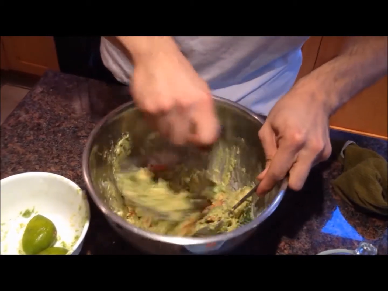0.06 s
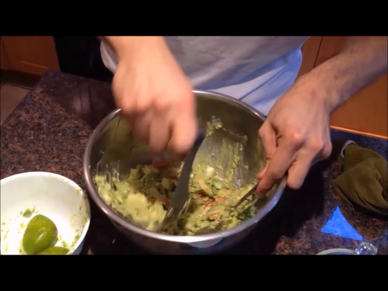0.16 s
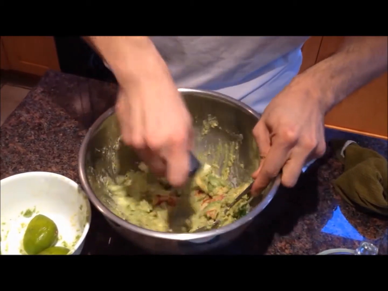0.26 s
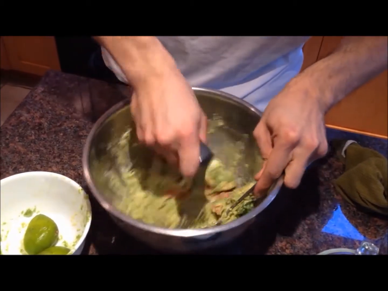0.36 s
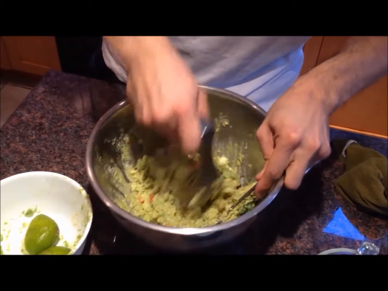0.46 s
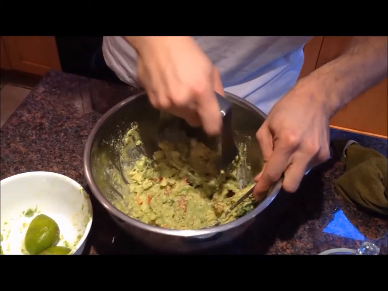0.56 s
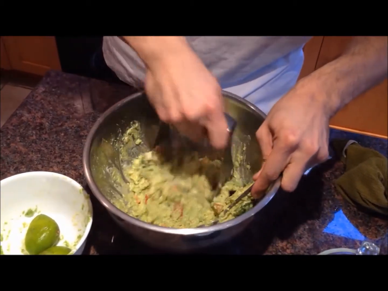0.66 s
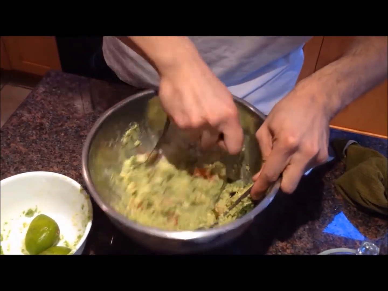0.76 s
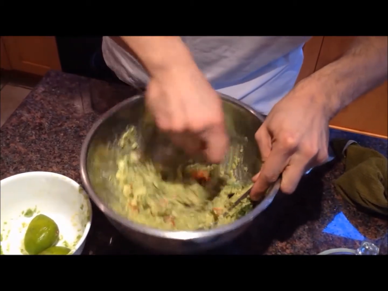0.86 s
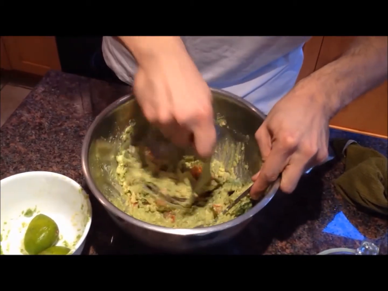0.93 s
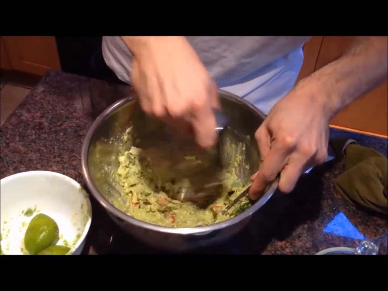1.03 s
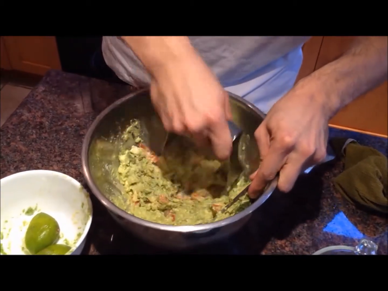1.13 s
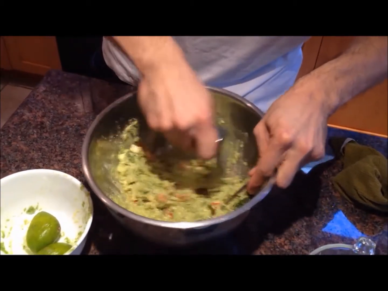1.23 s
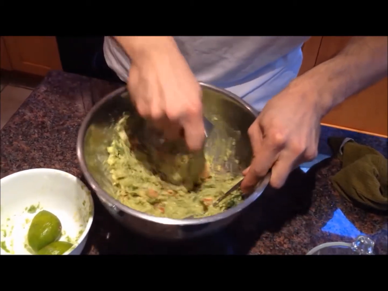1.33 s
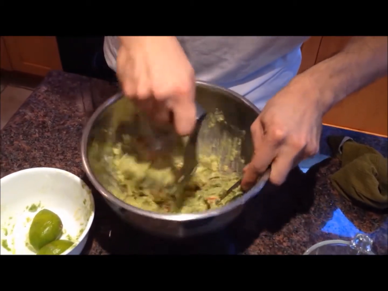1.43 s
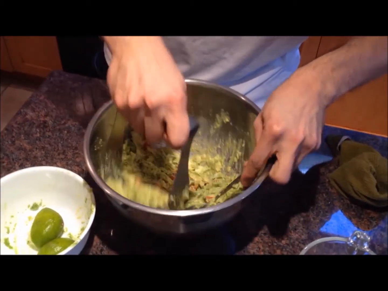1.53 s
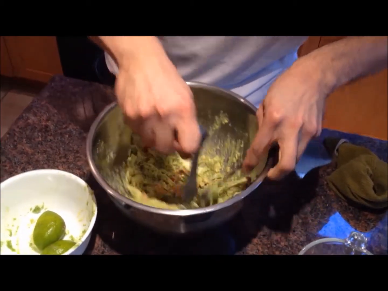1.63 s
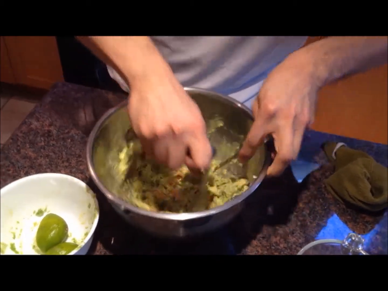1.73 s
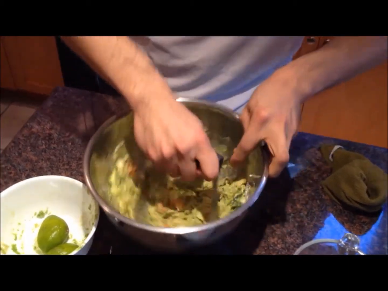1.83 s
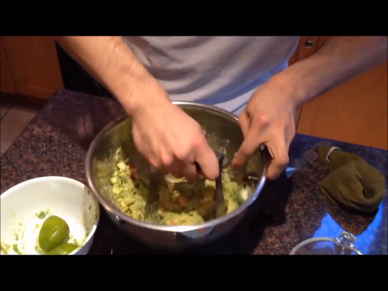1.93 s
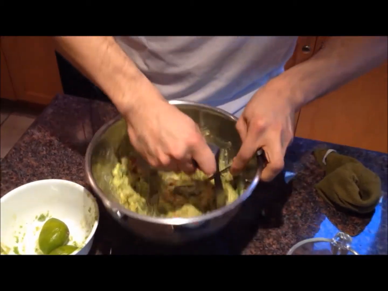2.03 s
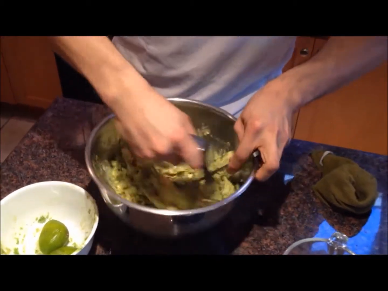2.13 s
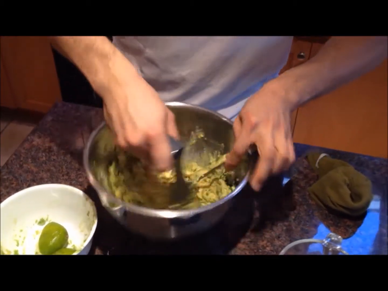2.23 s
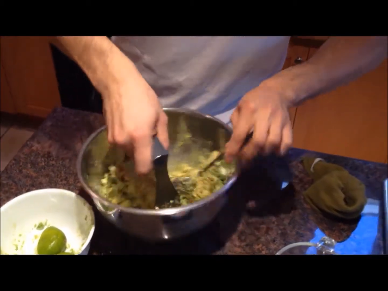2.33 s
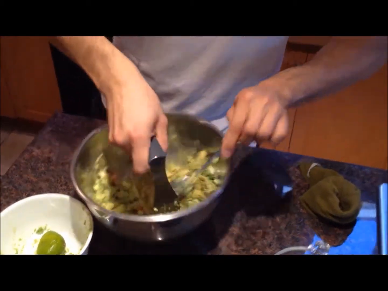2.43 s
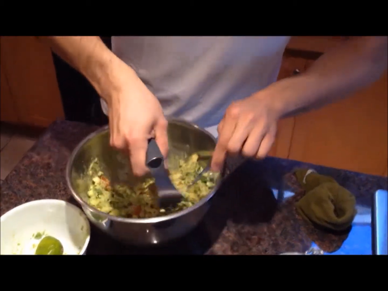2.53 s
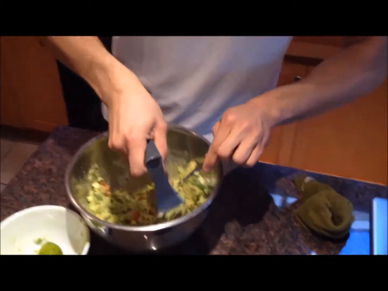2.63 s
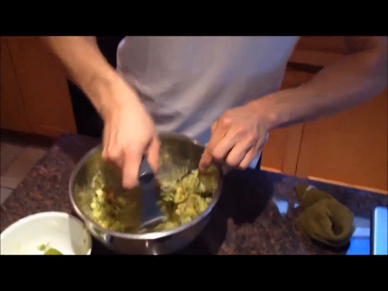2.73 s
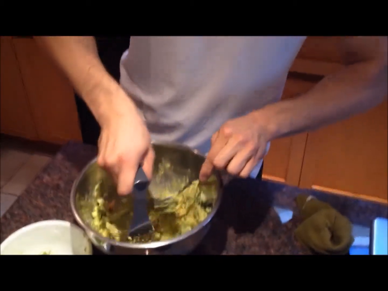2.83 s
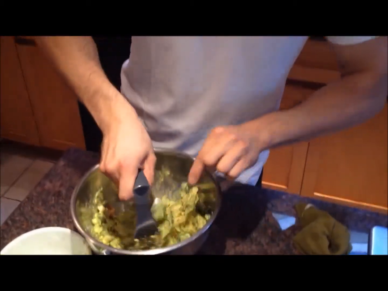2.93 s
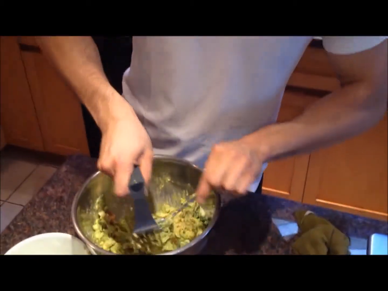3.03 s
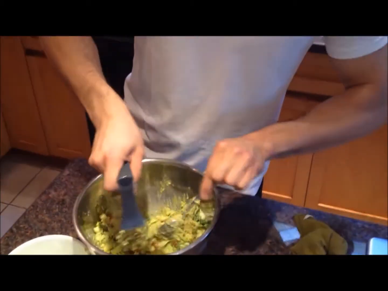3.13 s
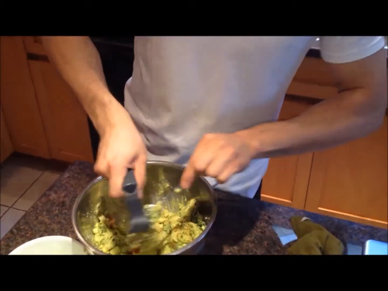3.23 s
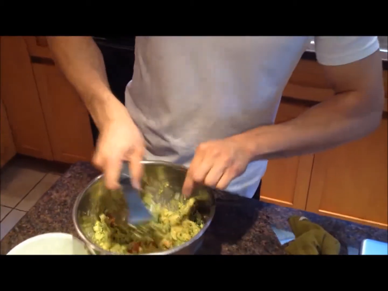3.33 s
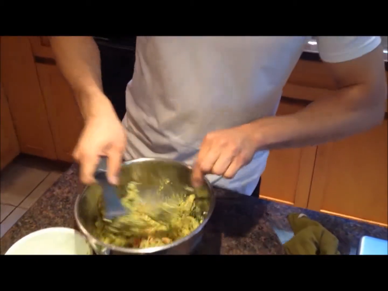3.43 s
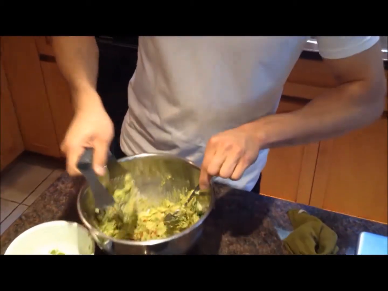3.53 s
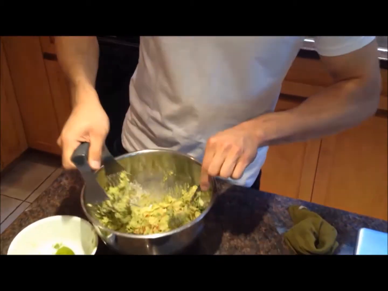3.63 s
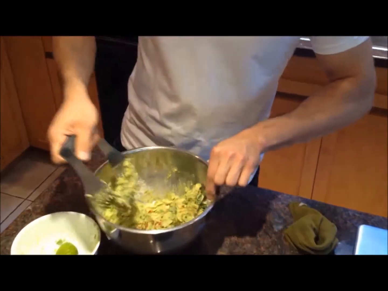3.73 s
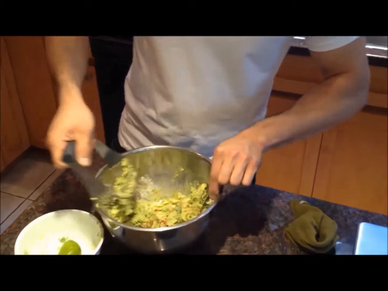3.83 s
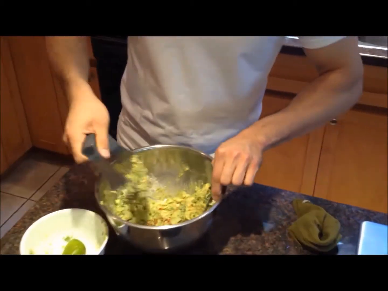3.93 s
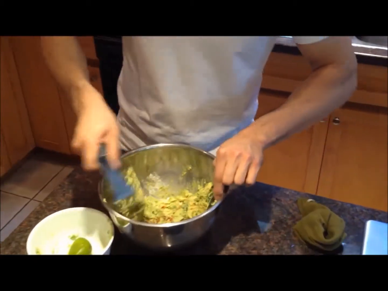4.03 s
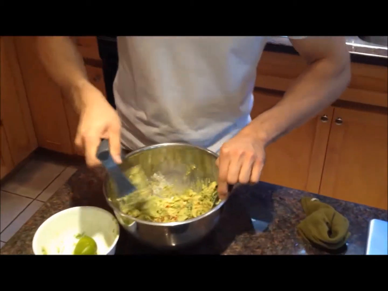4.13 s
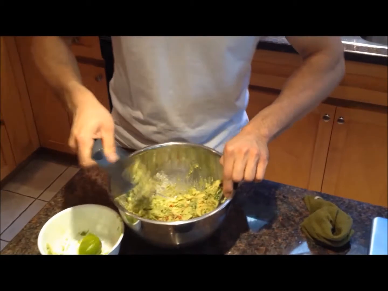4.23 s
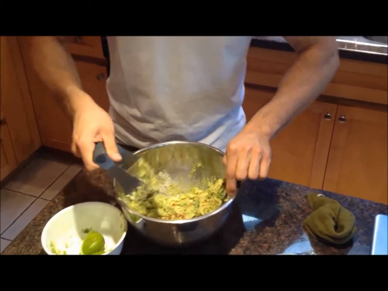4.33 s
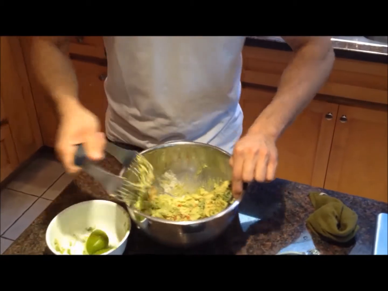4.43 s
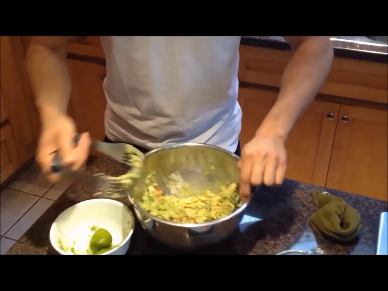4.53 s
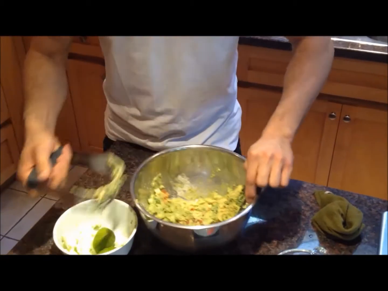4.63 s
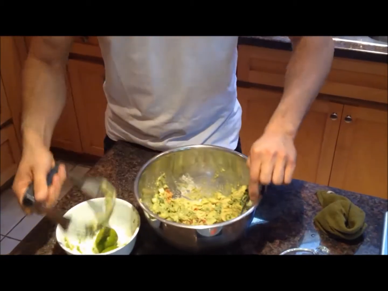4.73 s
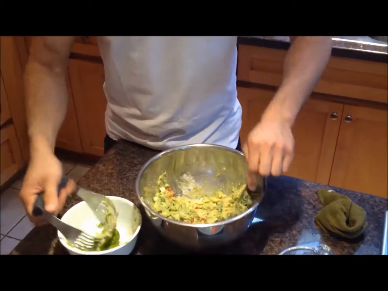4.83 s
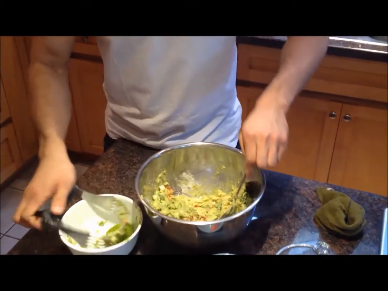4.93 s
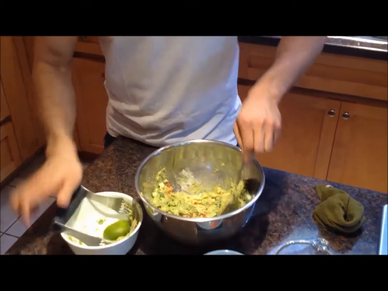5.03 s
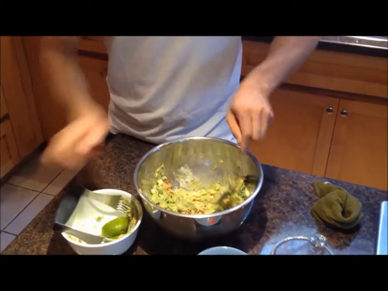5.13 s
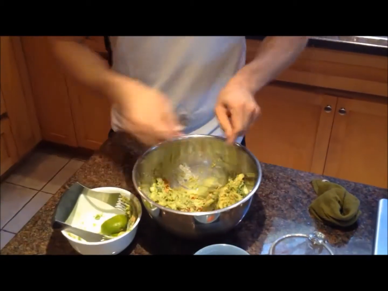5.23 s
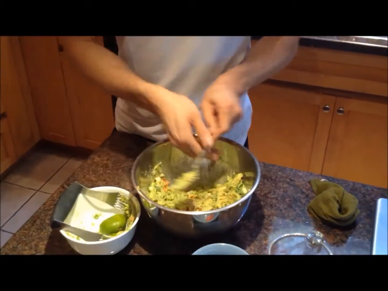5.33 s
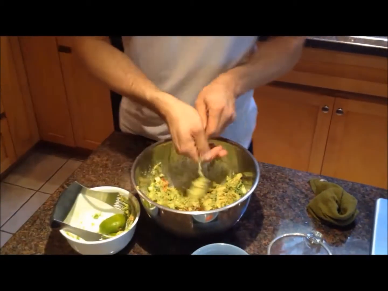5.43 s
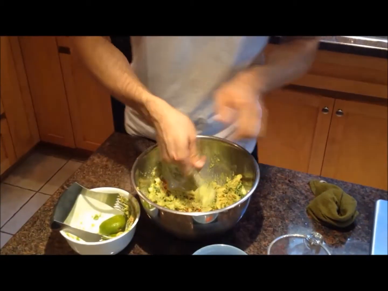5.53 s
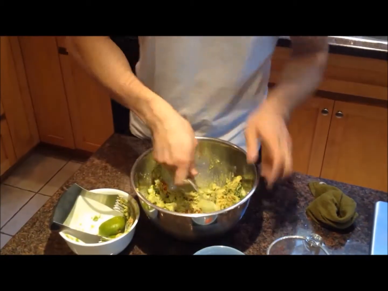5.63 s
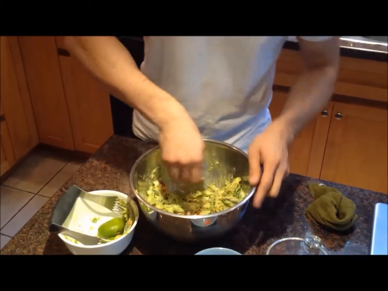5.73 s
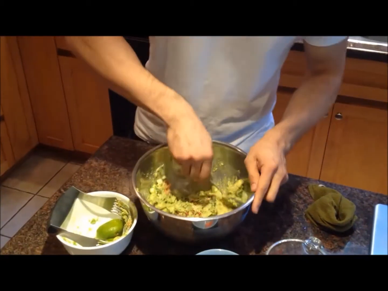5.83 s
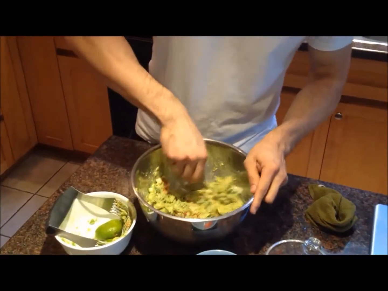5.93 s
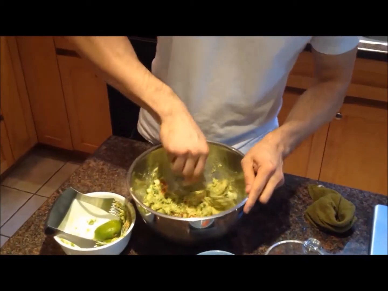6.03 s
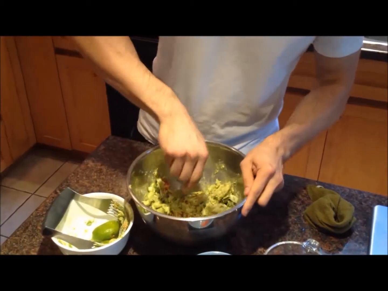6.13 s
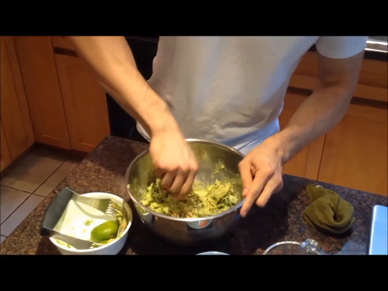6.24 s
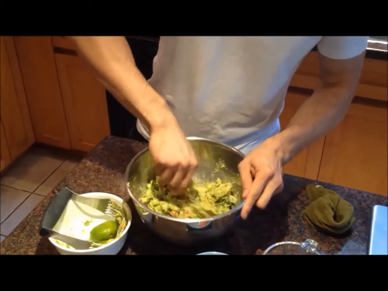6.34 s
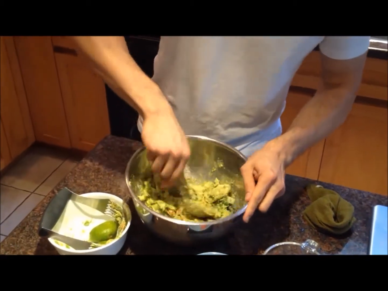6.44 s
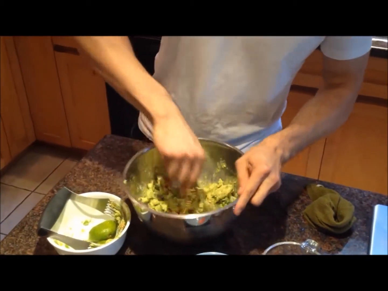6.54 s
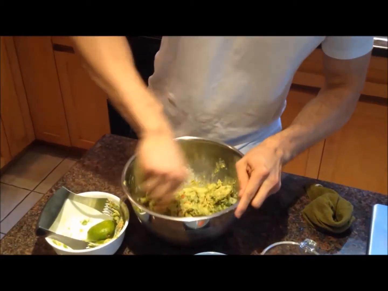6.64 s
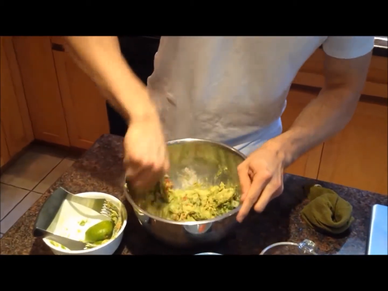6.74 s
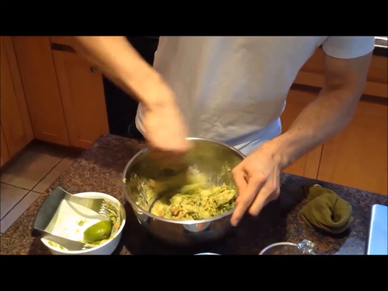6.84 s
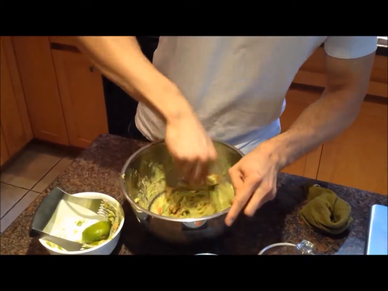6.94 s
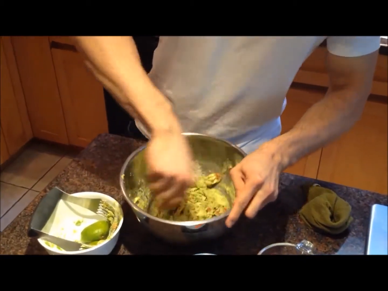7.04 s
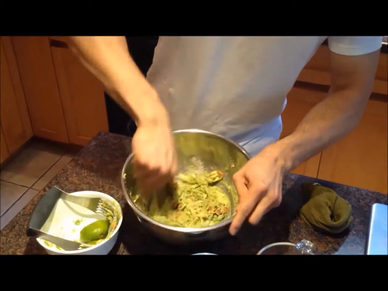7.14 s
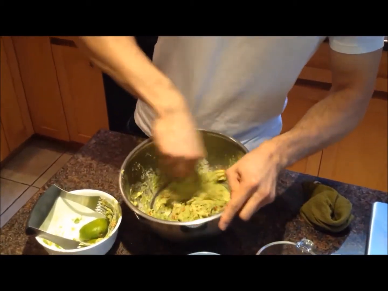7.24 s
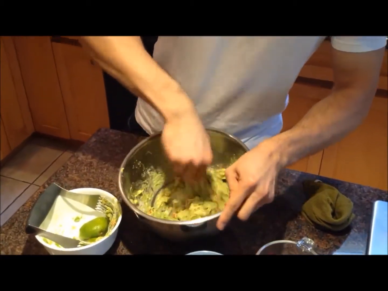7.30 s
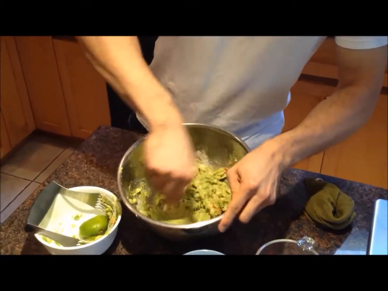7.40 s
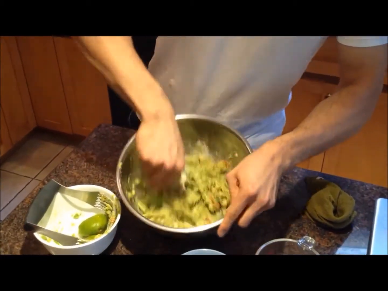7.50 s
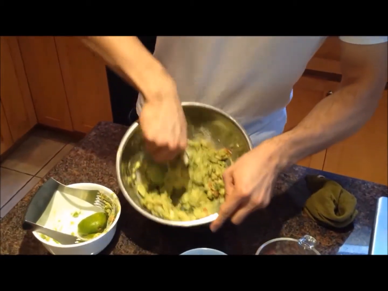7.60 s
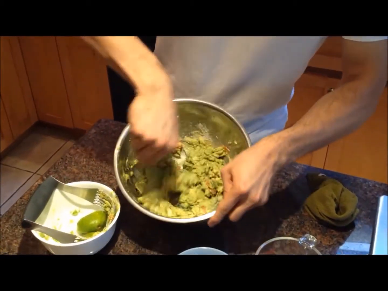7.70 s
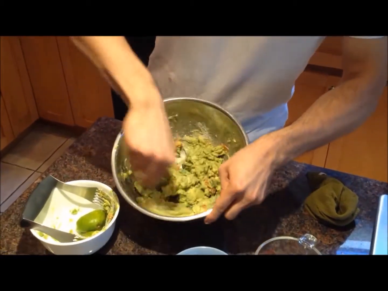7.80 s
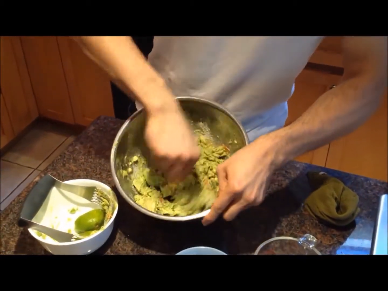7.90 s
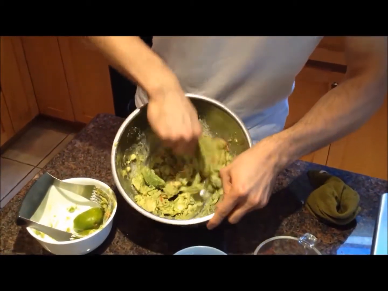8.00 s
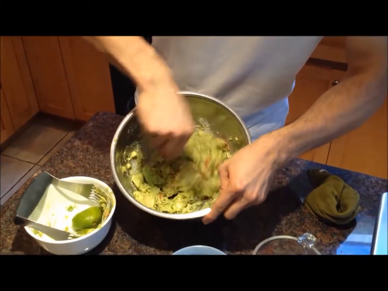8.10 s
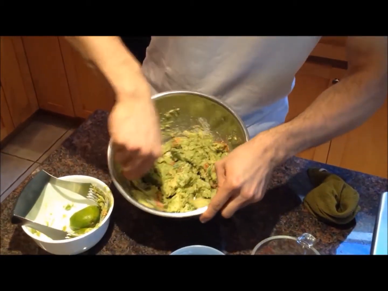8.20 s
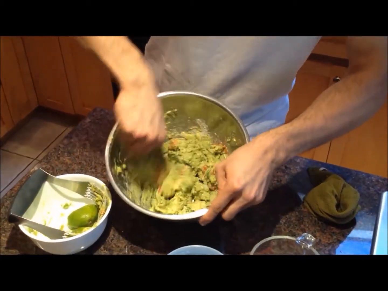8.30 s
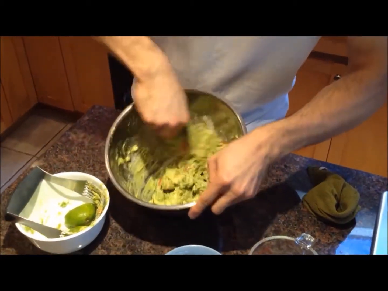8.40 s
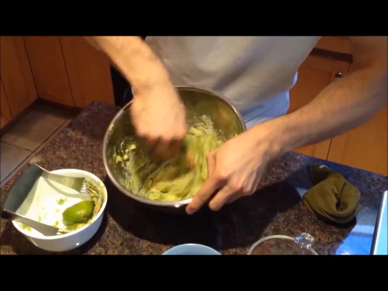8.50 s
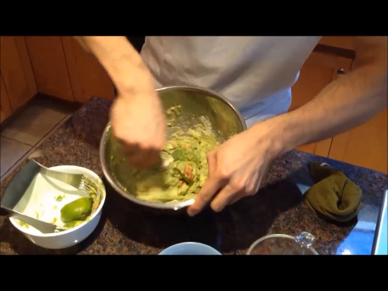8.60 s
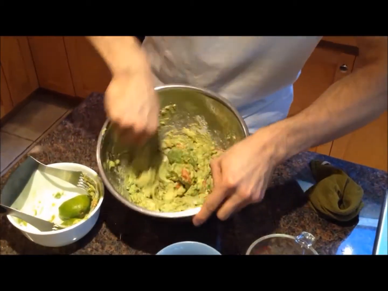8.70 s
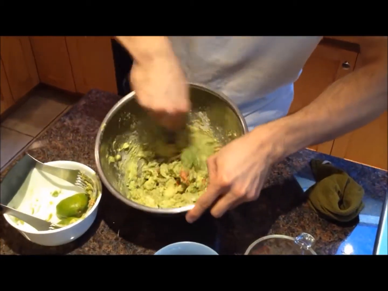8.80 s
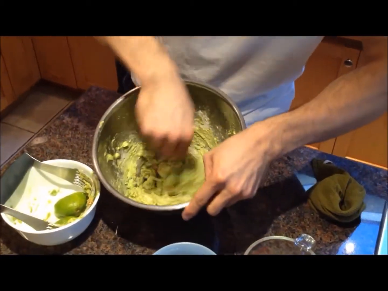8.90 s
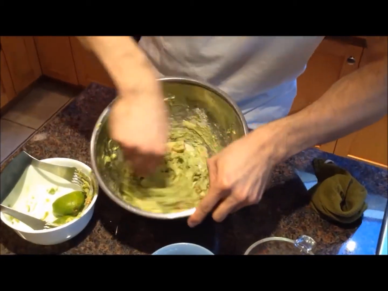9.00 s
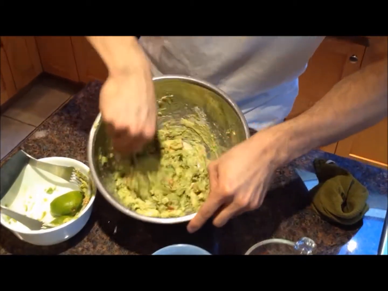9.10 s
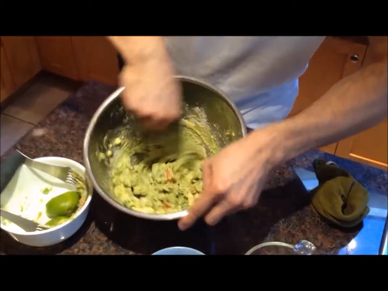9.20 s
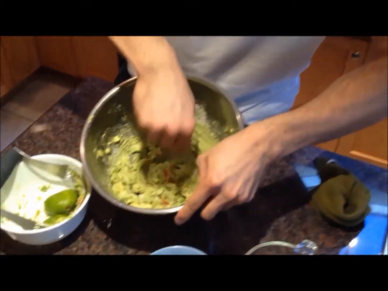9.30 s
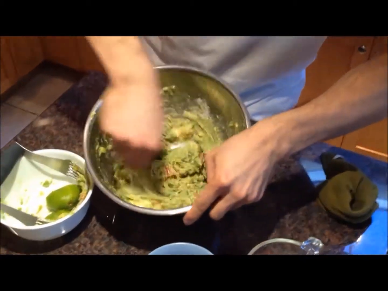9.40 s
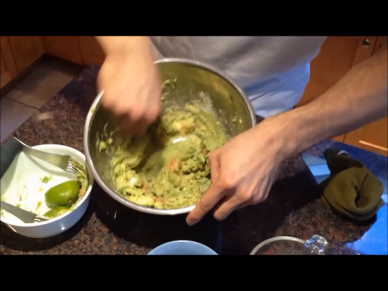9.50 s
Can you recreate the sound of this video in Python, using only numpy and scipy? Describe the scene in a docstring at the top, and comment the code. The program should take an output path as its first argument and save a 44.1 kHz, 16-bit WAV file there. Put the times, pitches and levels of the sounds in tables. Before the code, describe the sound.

In a small hard kitchen, a masher and fork churn avocado in a steel bowl with sticky crackles, smacks and dull booming knocks. Near the middle, tines tap the rim with clear rings and the masher clatters into a china dish. Then the fork stirs on with softer, thicker strokes. The microphone is close, mono, with short room reflections and a faint hiss and drone.

```python
"""A wet crackling stroke, then knocks: a fork and a masher work avocado in a steel bowl on a stone counter.
Strokes drive pops, smacks and churning noise; knocks add contact noise to the boom and ring of a mash-damped bowl.
Near halfway the tines tap the rim and ring it, and the masher clatters into a china dish; then the fork stirs on.
Thin sine whistles, one stick-slip squeak, faint hiss and an appliance drone lie beneath.
A small hard room, decaying noise after the direct sound, answers blows, mash and whistles."""
import sys
import numpy as np
from scipy import signal
from scipy.fft import rfft, irfft
from scipy.io import wavfile

SR = 44100
rng = np.random.default_rng(int(sys.argv[2]) if len(sys.argv) > 2 else 0)


def unload_audio(sound):
    """Save the sound as a 16-bit wav file, at the path given as the first command line argument."""
    columns = np.transpose(np.atleast_2d(sound))
    # keep every value between -1 and 1, then stretch to whole-number steps
    steps = np.round(np.clip(columns, -1, 1) * 32767)
    wavfile.write(sys.argv[1], SR, steps.astype(np.int16))


N = 421596
TIME = np.arange(N) / SR
AGE = TIME[:SR]  # time since a blow [s]


def amp(db):
    """Decibels to gain."""
    return 10 ** (np.asarray(db) / 20)


def unit(x):
    """Scale to an energy of one."""
    return x / np.sqrt(np.sum(x ** 2))


def steady(x):
    """Scale to a standard deviation of one."""
    return x / np.std(x)


def fade(t60_s):
    """Exponential decay: 60 dB in t60_s."""
    return np.exp(-np.log(1000) * AGE / t60_s)


def burst(t60_s):
    """Decaying white noise of unit energy."""
    return unit(rng.standard_normal(SR) * fade(t60_s))


def band(x, lo_hz, hi_hz, order=3):
    """Causal Butterworth band-pass."""
    edges_hz = [lo_hz, min(hi_hz, 0.49 * SR)]
    return signal.sosfilt(signal.butter(order, edges_hz, "band", fs=SR, output="sos"), x)


def resonate(x, hz, q):
    """One two-pole resonance."""
    return signal.lfilter(*signal.iirpeak(hz, q, fs=SR), x)


def resonate_twice(x, hz, q):
    """Two equal resonances in series: steeper skirts."""
    return resonate(resonate(x, hz, q), hz, q)


def colour(x, points, size=4096):
    """Minimum-phase filter through (frequency [Hz], gain [dB]) points."""
    hz, db = np.transpose(points)
    log_hz = np.log(np.fft.rfftfreq(size, 1 / SR) + 1)
    gain = amp(np.interp(log_hz, np.log(hz), db))
    cepstrum = irfft(np.log(gain))[:size // 2]
    cepstrum[1:] *= 2  # folded cepstrum: causal response
    response = irfft(np.exp(rfft(cepstrum, size)))
    return signal.fftconvolve(x, response)[:len(x)]


def add(out, s, x):
    """Mix a sound in at time s [s]."""
    i = max(int(s * SR), 0)
    out[i:i + len(x)] += x[:N - i]


KITCHEN_T60_S, KITCHEN_TREBLE_T60_S, KITCHEN_DB = 0.57, 0.31, -4


def kitchen(early_db=-6, early_t60_s=0.097, gap_s=0.0058):
    """Direct sound, quick echoes from bowl and counter, then the room, whose treble dies first."""
    low = band(burst(KITCHEN_T60_S), 40, 3500, order=2)
    treble = band(burst(KITCHEN_TREBLE_T60_S), 3000, SR / 2, order=2)
    echoes = amp(KITCHEN_DB) * (low + treble) + amp(early_db) * burst(early_t60_s)
    onset = np.clip(AGE / gap_s - 0.5, 0, 1)  # half open at gap_s
    return signal.unit_impulse(SR) + echoes * onset


# spectrum of the room's hiss: (frequency [Hz], gain [dB])
AIR_COLOUR = [(40, -31), (90, -24), (190, -1), (400, -1.5), (700, -9), (1500, -13), (3000, -20),
              (7000, -21), (15000, -30)]
AIR_DB = -60
HUM_HZ, HUM_DB = 384.7, -61.5


def room_air(hum_q=25):
    """Faint coloured hiss, and narrow-band noise as the drone of a kitchen appliance."""
    hiss = steady(colour(rng.standard_normal(N), AIR_COLOUR))
    hum = steady(resonate_twice(rng.standard_normal(N), HUM_HZ, hum_q))
    return amp(AIR_DB) * hiss + amp(HUM_DB) * hum


# faint high whistles: (start [s], length [s], top [Hz], pitch sag at both ends [0-1], level [dB])
WHISTLE_EVENTS = [(1.297, 0.23, 11500, .07, -61), (3.17, 0.19, 9600, 0.13, -56),
                  (3.48, 0.23, 12800, 0.2, -55.5), (3.565, 0.12, 8230, 0.1, -51.5),
                  (5.72, 0.14, 13200, .09, -67), (5.928, 0.23, 9650, 0.2, -60.5)]


def whistles(waver=0.006):
    """Thin, very high sines that arch in pitch and waver."""
    out = np.zeros(N)
    for s, length_s, top_hz, sag, db in WHISTLE_EVENTS:
        way = np.linspace(-1, 1, int(length_s * SR))
        unsteady = np.interp(way, np.linspace(-1, 1, 20), rng.standard_normal(20))
        hz = top_hz * (1 - sag * way ** 2 + waver * unsteady)
        swell = (1 - way ** 2) ** 2
        add(out, s, amp(db) * swell * np.sin(2 * np.pi * np.cumsum(hz) / SR))
    return signal.fftconvolve(out, unit(kitchen()))[:N]


def fork_squeak(s=5.745, length_s=0.076, slip_hz=452, peak_hz=2600, db=-53):
    """One squeak: the fork sticks and slips along the steel, a sawtooth through a resonance."""
    age = AGE[:int(length_s * SR)]
    slips = signal.sawtooth(2 * np.pi * slip_hz * age)
    tone = steady(resonate(band(slips, 2500, 4700), peak_hz, q=3.0))
    out = np.zeros(N)
    add(out, s, amp(db) * tone * signal.windows.tukey(len(age), 0.5))
    return out


def ring(modes, scatter_db=0.5, detune=0.0033):
    """Decaying sine modes of an object; the place of the blow weights them anew each time."""
    chance = rng.standard_normal((len(modes), 3))
    out = np.zeros(SR)
    for (hz, db, t60_s), (weight, shift, side) in zip(modes, chance):
        level = np.sign(side) * amp(db + scatter_db * weight)
        out += level * fade(t60_s) * np.sin(2 * np.pi * hz * (1 + detune * shift) * AGE)
    return unit(out)


def contact(points, crack_db, crack_t60_s, rattle_t60_s, rise_s=0.0013):
    """A crack as the contact closes, and the short rattle of many damped modes after it, as noise."""
    closing = np.minimum(AGE / rise_s, 1)
    noise = amp(crack_db) * burst(crack_t60_s) + burst(rattle_t60_s)
    return unit(colour(noise * closing, points))


# edges of the thud register and the three contact registers: [Hz]
REGISTER_EDGES_HZ = [65, 750, 2000, 7000, 15000]


def blow(x, thud_db, contact_db, tilt_db, arch_db, attack_s=0.05):
    """A blow in the room: the thud fills the bass; the contact arches above it and tilts up when hard."""
    x = signal.fftconvolve(x, kitchen())[:SR]
    levels_db = [thud_db] + [contact_db + tilt_db * k - arch_db * k ** 2 for k in (-1, 0, 1)]
    out = np.zeros(SR)
    for lo_hz, hi_hz, db in zip(REGISTER_EDGES_HZ, REGISTER_EDGES_HZ[1:], levels_db):
        part = band(x, lo_hz, hi_hz)
        out += amp(db) * part / np.std(part[:int(attack_s * SR)])  # level over the attack
    return out


# masher into the china dish: (time [s], thud [dB], contact [dB], hardness tilt [dB per register])
DISH_BLOWS = [(4.887, -40, -31.5, 1.5), (4.918, -38.5, -44, -13), (4.946, -38.5, -51, -19.5),
              (4.985, -31, -22, 3), (5.008, -38, -19.5, 2), (5.112, -51, -34, -3.5),
              (5.151, -38.5, -32.5, -5)]
# ring of the china: (frequency [Hz], level [dB], t60 [s])
CHINA_MODES = [(863, -6.5, 0.34), (825, -12, 0.19), (962, -14, 0.46), (1044, -16.5, 0.51),
               (1678, -18, 0.27), (2530, -7, 0.28), (3920, 4.5, 0.35), (5615, 2, .3), (5688, 2, .3),
               (6885, -4, .07), (7589, 2, .27), (9750, -5, .17), (10100, -4, .2), (11165, -6, 0.11),
               (11847, -8.5, 0.24)]
# contact noise on china: (frequency [Hz], gain [dB])
CHINA_COLOUR = [(70, -39.5), (200, -9), (480, 5), (650, -2.5), (880, 2.5), (1400, -9.5), (4000, 7.5),
                (5100, -5), (5700, 6.5), (7300, -3), (9000, -16), (10000, -10.5), (12300, -4.5),
                (14000, -14)]


def dish_clatter(modes_db=-2):
    """The masher lands in the china dish, bounces and settles: each impact rings the modes and cracks."""
    out = np.zeros(N)
    for s, thud_db, contact_db, tilt_db in DISH_BLOWS:
        china = ring(CHINA_MODES, scatter_db=2, detune=0.0005)
        crack = contact(CHINA_COLOUR, crack_db=0, crack_t60_s=0.022, rattle_t60_s=0.16, rise_s=0.0003)
        add(out, s, blow(amp(modes_db) * china + crack, thud_db, contact_db, tilt_db, arch_db=2.5))
    return out


# tines on the bare rim: (time [s], thud [dB], contact [dB], hardness tilt [dB per register],
#                         crack over rattle [dB], tine pitch [Hz], tine over rim [dB])
TINE_TAPS = [(3.814, -50.5, -28, 6.5, 8.5, 3150, 2), (3.855, -24, -32.5, -13, -0.5, 3040, -7),
             (3.872, -31.5, -25, -4.5, -6, 4046, -2), (4.032, -29.5, -17.5, -3.5, -7.5, 3184, 1),
             (4.2, -33, -25, -1, 13.5, 2674, 5.5), (4.289, -27, -18.5, -2, -4.5, 4055, -8.5),
             (5.731, -66, -49.5, 0, -10, 2640, -31)]
# ring of the rim: (frequency [Hz], level [dB], t60 [s])
RIM_RING_MODES = [(308, -3.5, 0.12), (533, 3.5, 0.33), (805, -7.5, 0.63), (1733, -12, 0.49),
                  (2165, 2, 0.18), (2270, -3, 0.22), (2636, 0.5, 0.18), (3280, -2, 0.38), (3520, -9, .25),
                  (3800, -10, 0.27), (4200, -10, .25), (4710, -11, 0.33), (5340, -9.5, .22),
                  (5604, 2, 0.15), (5670, -6, 0.13), (6870, 1.5, 0.094), (6710, 14, 0.028)]
# contact noise on the rim: (frequency [Hz], gain [dB])
RIM_CONTACT_COLOUR = [(75, -36), (130, -20.5), (300, 4), (600, 4.5), (1200, -7), (2600, -6.5), (4800, -6),
                      (6300, -0.5), (7500, -11), (9200, -9), (10300, -12), (12500, -15), (15500, -24)]


def rim_taps(modes_db=-4, tine_t60_s=0.27, pair_gap_hz=47):
    """Steel on bare steel: the rim rings, and two neighbouring tines beat against each other."""
    out = np.zeros(N)
    for s, thud_db, contact_db, tilt_db, crack_db, hz, tine_db in TINE_TAPS:
        pair = [(hz, 0, tine_t60_s), (hz + pair_gap_hz, -5, tine_t60_s)]
        tines = ring(pair, detune=0.0049)
        steel = unit(ring(RIM_RING_MODES) + amp(tine_db) * tines)
        crack = contact(RIM_CONTACT_COLOUR, crack_db, crack_t60_s=0.018, rattle_t60_s=0.16)
        add(out, s, blow(amp(modes_db) * steel + crack, thud_db, contact_db, tilt_db, arch_db=10.5))
    return out


# strokes through the mash: (start [s], length [s], level [dB])
MASH_STROKES = [(0.0, 0.054, -47), (0.224, 0.22, -50.5), (0.606, 0.25, -49.5), (1.129, 0.19, -46),
                (1.623, 0.2, -55.5), (1.915, 0.23, -52), (2.458, 0.27, -48.5), (3.148, 0.5, -59.5),
                (5.746, 0.31, -57.5), (6.192, 0.24, -60.5), (6.601, 0.47, -50), (7.131, 0.16, -47),
                (7.408, 0.21, -53.5), (7.772, 0.26, -50), (8.265, 0.21, -48.5), (8.683, 0.35, -52),
                (9.132, 0.54, -51)]
STROKE_ATTACK_S, STROKE_RELEASE_S = 0.03, 0.07  # linear rise, exponential time constant


def stirring():
    """Pressure on the paste: each stroke builds up, holds and lets go."""
    pressure = np.zeros(N)
    for s, length_s, db in MASH_STROKES:
        attack = np.clip((TIME - s) / STROKE_ATTACK_S, 0, 1)
        release = np.exp(-np.maximum(TIME - s - length_s, 0) / STROKE_RELEASE_S)
        pressure = np.maximum(pressure, amp(db) * attack * release)
    return pressure


# spectrum of the mash: (frequency [Hz], gain [dB])
PASTE_COLOUR = [(500, 14.5), (1000, 2), (2700, -1), (4800, -6.5), (6400, -1), (8500, -6.5), (12000, -6.5),
                (15500, -12.5)]


def crackle(per_s=6000, spread_db=3.0, clump_db=5.5, count=18):
    """Tiny air pockets burst in clumps, many faint and a few loud, each at one of count pitches."""
    step = SR // 40
    clumps = np.interp(TIME, TIME[::step], rng.standard_normal(len(TIME[::step])))
    at = rng.integers(0, N, int(per_s * N / SR))
    rarity = np.minimum(rng.exponential(size=len(at)), 4.5)
    signs = rng.choice([-1, 1], len(at))
    sizes = amp(spread_db * rarity + clump_db * clumps[at]) * signs
    out = np.zeros(N)
    for k, hz in enumerate(np.geomspace(700, 14000, count)):
        pops = np.bincount(at[k::count], sizes[k::count], N)
        out += resonate_twice(pops, hz, q=3.5)
    return steady(colour(out, PASTE_COLOUR))


# mash squeezed through the tines: (middle [s], Gaussian half length [s], level [dB], centre [Hz])
TINE_SQUELCHES = [(0.458, 0.0031, -40, 2620), (0.785, 0.02, -39.5, 2800), (0.963, 0.0053, -42, 6600),
                  (1.176, 0.011, -41, 2620), (1.637, 0.0056, -37.5, 6000), (1.79, 0.01, -47.5, 6340),
                  (2.72, 0.0099, -29.5, 7700), (3.146, 0.0076, -39, 9100), (3.428, 0.028, -40, 9200),
                  (6.922, 0.025, -44, 2800), (6.988, 0.0076, -40, 3000), (7.99, 0.023, -35, 6000),
                  (8.723, 0.021, -41, 2880)]
CHURN_HZ, CHURN_Q, CHURN_DB = 480, 1.9, -8  # the base murmurs under the moving utensil


def mash(wet_db=0, smack_db=-5.0):
    """Crackle, lower smacking and dull churning follow the strokes; paste forced through tines squelches."""
    paste = crackle()
    wet = steady(band(paste, 2600, 16000))
    smack = steady(band(paste, 1015, 2425))
    churn = steady(resonate_twice(rng.standard_normal(N), CHURN_HZ, CHURN_Q))
    out = stirring() * (amp(wet_db) * wet + amp(smack_db) * smack + amp(CHURN_DB) * churn)
    for s, half_s, db, hz in TINE_SQUELCHES:
        near = np.abs(TIME - s) < 4 * half_s
        swell = np.exp(-((TIME[near] - s) / half_s) ** 2 / 2)
        out[near] += amp(db) * swell * steady(resonate(paste[near], hz, q=1.0))
    return signal.fftconvolve(out, unit(kitchen()))[:N]


# utensil meets bowl: (time [s], thud [dB], contact [dB], hardness tilt [dB per register],
#                      crack over rattle [dB], base pitch [Hz], contact pitch [Hz])
BOWL_BLOWS = [(0.159, -44.5, -50, -5.5, 23, 565, 2470), (0.184, -36.5, -27, 0.5, 25, 505, 6300),
              (0.285, -43, -45, -6, 3, 531, 6400), (0.762, -46.5, -46, 3, -9, 447, 1180),
              (1.041, -28, -39, -5, 24, 524, 1230), (1.483, -20, -36, -6, 17, 527.5, 1090),
              (1.563, -30.5, -43.5, -10.5, 6, 513, 2720), (1.857, -23.5, -38.5, -6, 47, 523, 960),
              (2.069, -71, -39.5, -6.5, 13, 454, 1780), (2.153, -75, -51, -2, 23, 412, 2360),
              (2.31, -34, -44, -6.5, 27, 536, 1500), (2.418, -47.5, -39, 13, 37, 461, 6100),
              (2.44, -35.5, -50.5, -8.5, -3, 545, 2010), (2.565, -24, -41.5, -7, 1, 478.6, 1180),
              (2.622, -32, -44, -5, -28, 571.6, 1320), (2.671, -31.5, -42, 3.5, -27, 525, 1240),
              (3.044, -57, -38, 10, 21, 390, 4800), (3.335, -47, -28.5, 12, 15, 442, 6850),
              (4.634, -30.5, -43.5, -6.5, 14.5, 474, 1017), (5.813, -38, -52, -6, 1.5, 508, 920),
              (6.082, -40, -55, -8, -8, 482, 960), (6.333, -45, -47, -12.5, 22, 473, 2540),
              (6.552, -32, -43, -8.5, 9.5, 442, 1700), (6.673, -31, -47.5, -7.5, 2, 403, 850),
              (7.195, -35, -47.5, -9, -2, 463, 1720), (7.306, -24, -50.5, -17.5, 3.5, 551, 1040),
              (7.97, -34, -47.5, -11, 2, 468, 2140), (8.221, -51.5, -56, 10.5, 2, 327, 2640),
              (8.363, -25.5, -30.5, -7.5, 20, 450, 3800), (8.759, -24.5, -36, -7.5, 24, 475, 825),
              (9.214, -39, -36.5, -9, 27, 465, 1980), (9.27, -24, -49, -1, 13, 531, 960)]
# ring of the mash-damped bowl: (frequency [Hz], level [dB], t60 [s])
BOWL_RING_MODES = [(176.5, -6, 0.071), (299.3, -1, 0.14), (418.4, -6, 0.14), (479, 0.5, 0.13),
                   (579, -6.5, .2), (815, -26.5, 0.099), (1073, -14, 0.23), (2046, -12, 0.15),
                   (2690, -26.5, 0.15), (2900, -20.5, .08), (6380, -10, 0.095)]
# contact noise on the bowl: (frequency [Hz], gain [dB])
BOWL_CONTACT_COLOUR = [(80, -50.5), (120, -19), (170, -2), (300, -1.5), (520, 3.5), (700, -11), (900, -1.5),
                       (1500, -10.5), (2500, -9.5), (5000, -11), (6600, -7), (8500, -7.5), (12000, -2),
                       (15500, -15)]
# free ring of the steel before and after the hand tightens on the rim at GRIP_S
GRIP_S, LOOSE_RING_DB, HELD_RING_DB = 3.0, 5, -6.5
# the base gains on the contact noise by BODY_GROWTH dB per dB of thud above a firm blow
FIRM_THUD_DB, BODY_GROWTH = -24, 0.33
# the struck base starts sharp by this share and settles to its pitch
SETTLE_SHARE, SETTLE_S = 0.2545, 0.0094
# the higher a contact snaps, the more it gathers in the middle treble
ARCH_DB_PER_OCTAVE, FLAT_SNAP_HZ = 3, 550


def bowl_knocks(base_t60_s=0.2, boom_db=2, boom_t60_s=0.081, flex_db=-1, flex_t60_s=0.044,
                modes_db=-4, snap_db=-3.0, snap_q=1.6, sway_s=0.0044):
    """The utensil hits the bowl: mash chokes the wall, while the flat base flexes and booms on the counter."""
    out = np.zeros(N)
    for s, thud_db, contact_db, tilt_db, crack_db, base_hz, snap_hz in BOWL_BLOWS:
        ring_db = LOOSE_RING_DB if s < GRIP_S else HELD_RING_DB
        boom = unit(resonate_twice(burst(boom_t60_s), base_hz, q=2.1))
        settling_hz = base_hz * (1 + SETTLE_SHARE * np.exp(-AGE / SETTLE_S))
        flex = unit(fade(flex_t60_s) * np.sin(2 * np.pi * np.cumsum(settling_hz) / SR))
        steel = ring([(base_hz, 0, base_t60_s)]) + amp(modes_db) * ring(BOWL_RING_MODES)
        # the loaded bowl is heavy: it takes a firm blow and a few milliseconds to get moving
        moving = amp(BODY_GROWTH * (thud_db - FIRM_THUD_DB)) * (1 - np.exp(-AGE / sway_s))
        body = (amp(boom_db) * boom + amp(flex_db) * flex + amp(ring_db) * steel) * moving
        tick = contact(BOWL_CONTACT_COLOUR, crack_db, crack_t60_s=0.018, rattle_t60_s=0.25)
        # a padded contact snaps low, a bare one high
        snap = band(unit(resonate(tick, snap_hz, snap_q)), 800, 16000, order=2)
        arch_db = ARCH_DB_PER_OCTAVE * np.log2(snap_hz / FLAT_SNAP_HZ)
        add(out, s, blow(tick + amp(snap_db) * snap + body, thud_db, contact_db, tilt_db, arch_db))
    return out


def scene():
    """Everything at the counter, in one channel."""
    background = room_air() + whistles() + fork_squeak()
    blows = dish_clatter() + rim_taps() + bowl_knocks()
    return (background + mash() + blows)[None]


def record(dry):
    """Round the highest peaks, then cut the top above 15.4 kHz."""
    lowpass = signal.ellip(10, 0.2, 70, 15400, fs=SR, output="sos")
    return signal.sosfilt(lowpass, np.tanh(dry))


dry = scene()
out = record(dry)
unload_audio(out)
```